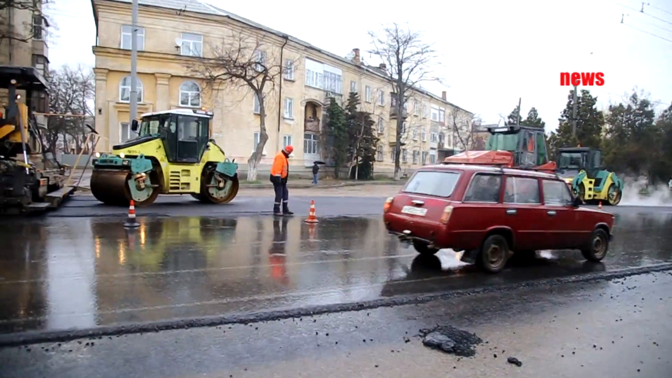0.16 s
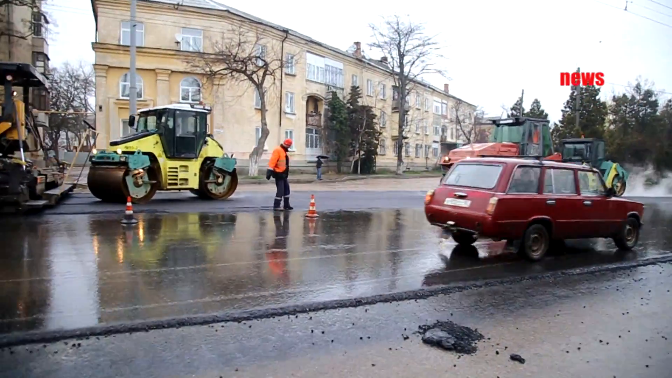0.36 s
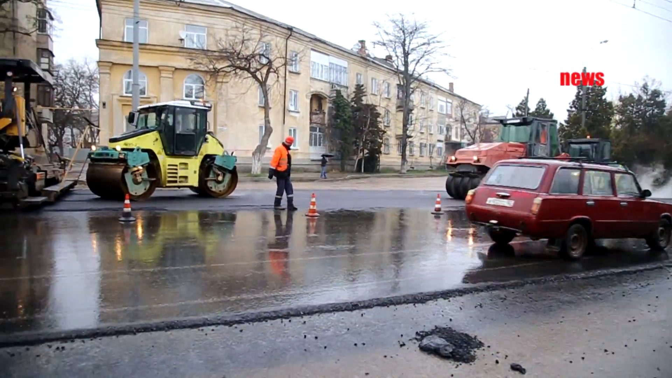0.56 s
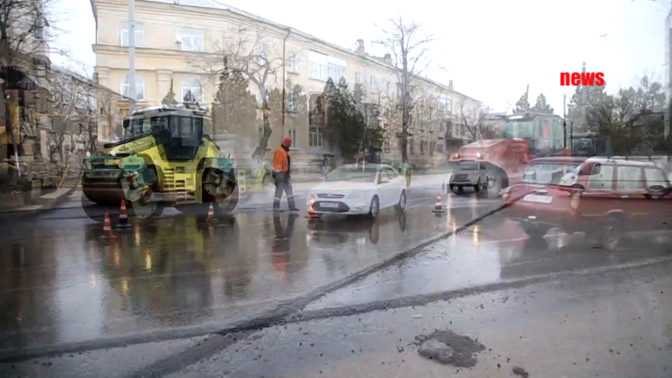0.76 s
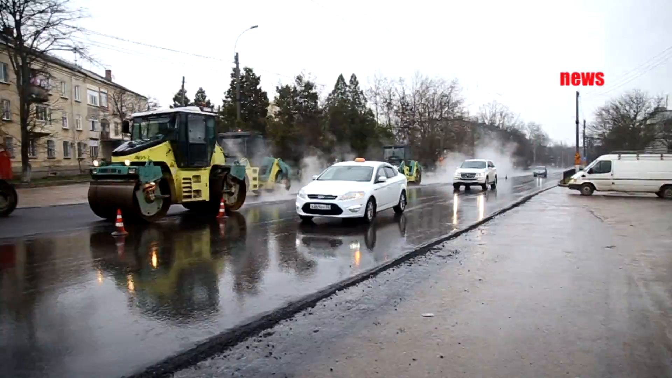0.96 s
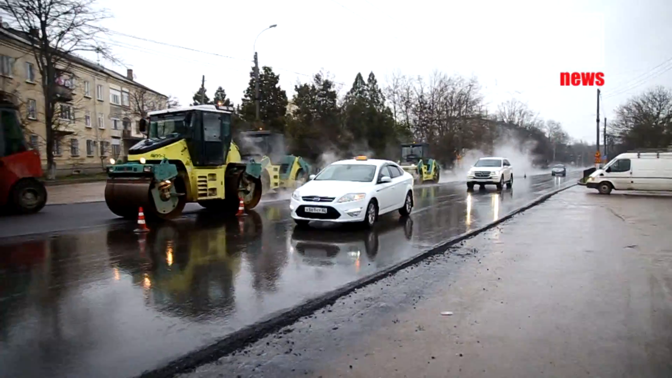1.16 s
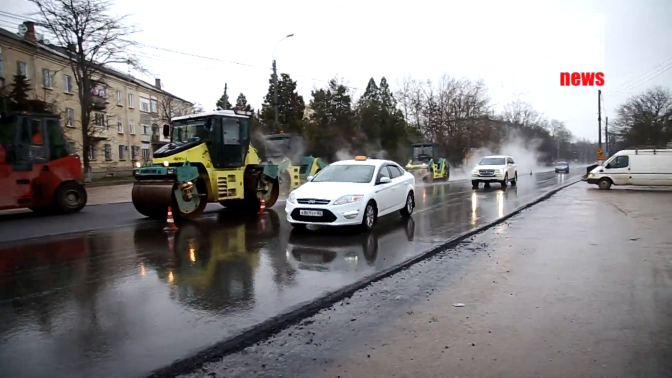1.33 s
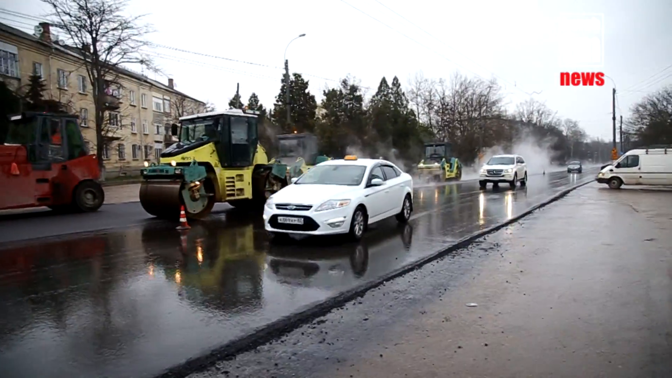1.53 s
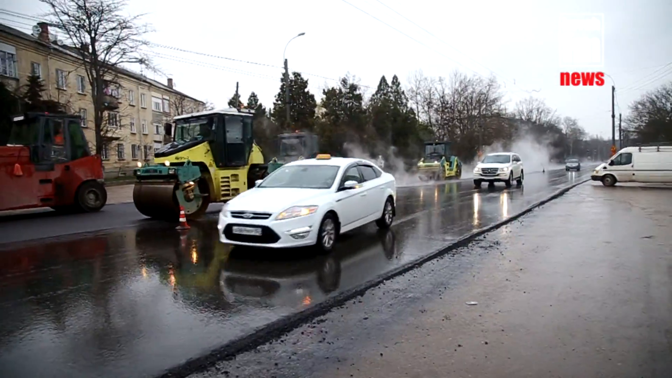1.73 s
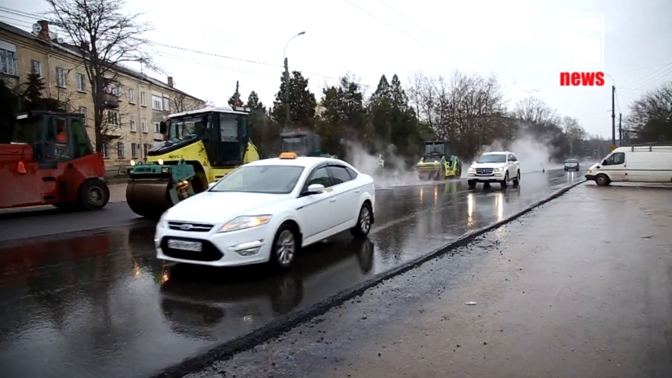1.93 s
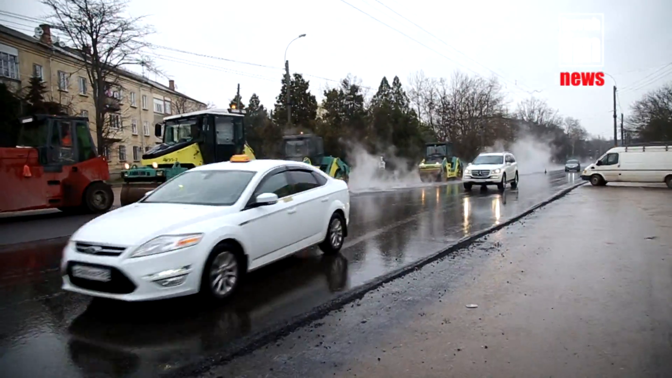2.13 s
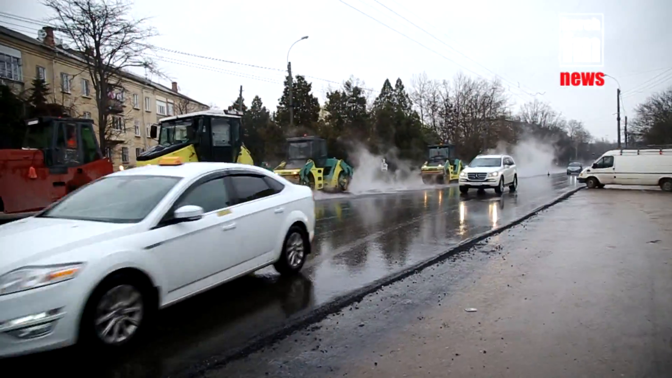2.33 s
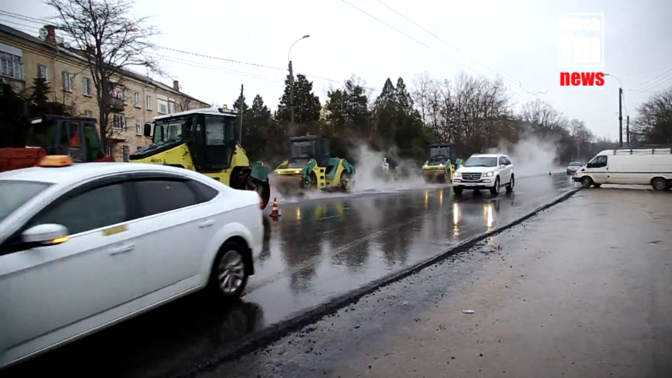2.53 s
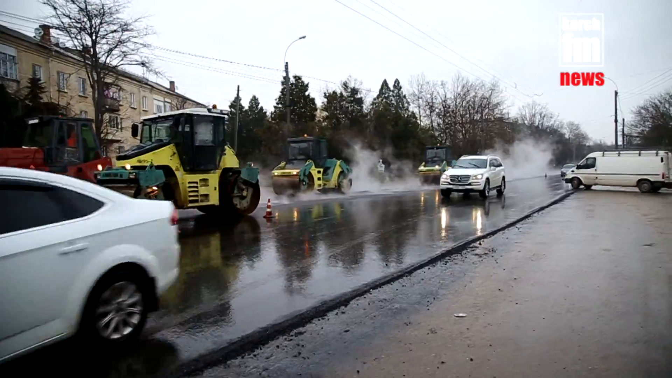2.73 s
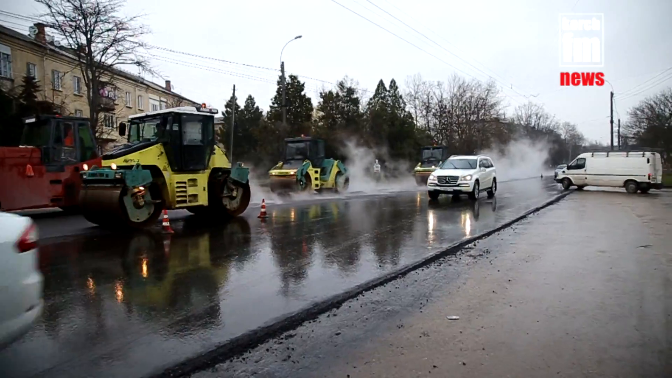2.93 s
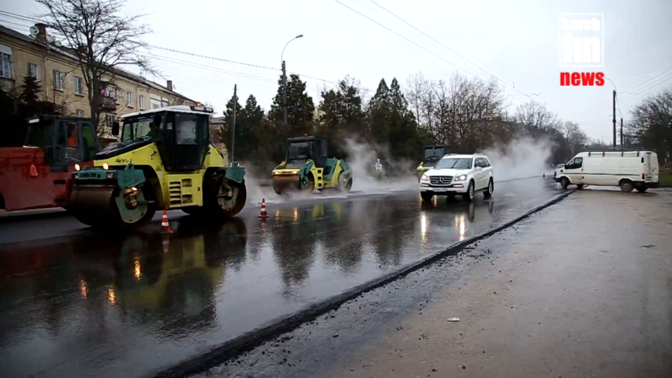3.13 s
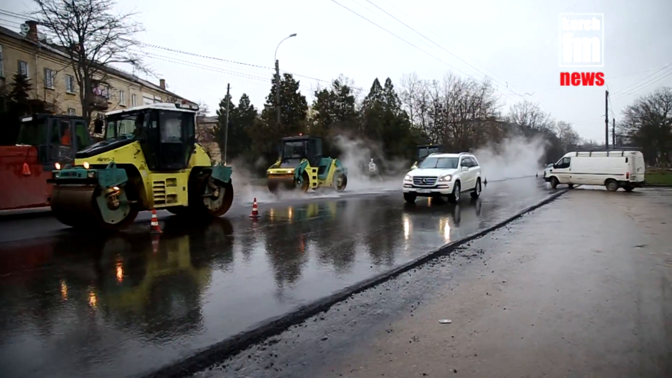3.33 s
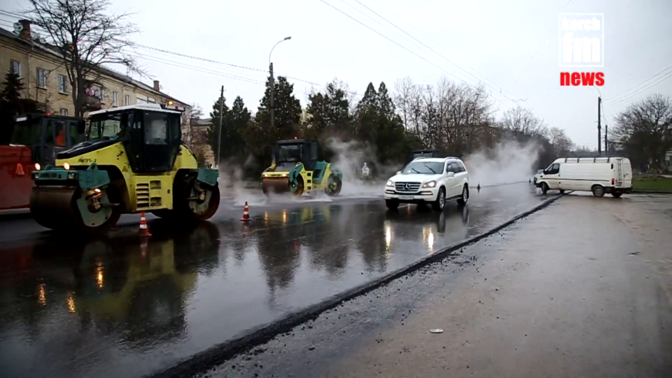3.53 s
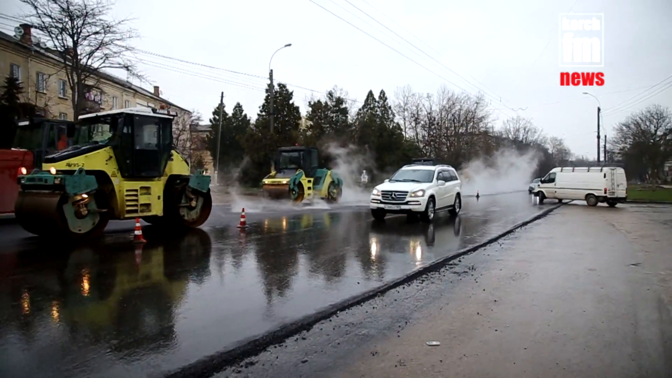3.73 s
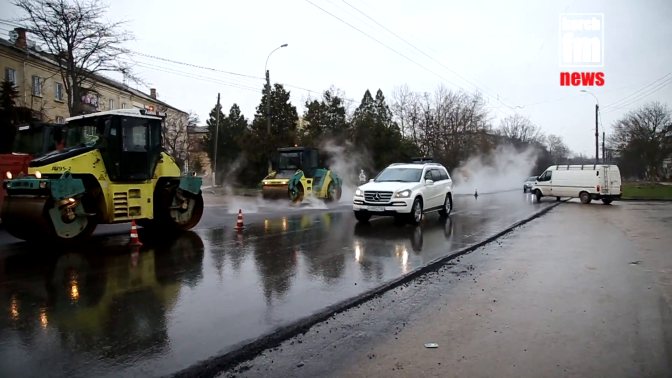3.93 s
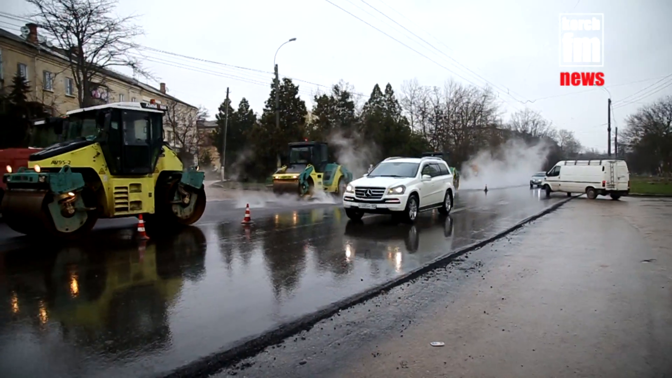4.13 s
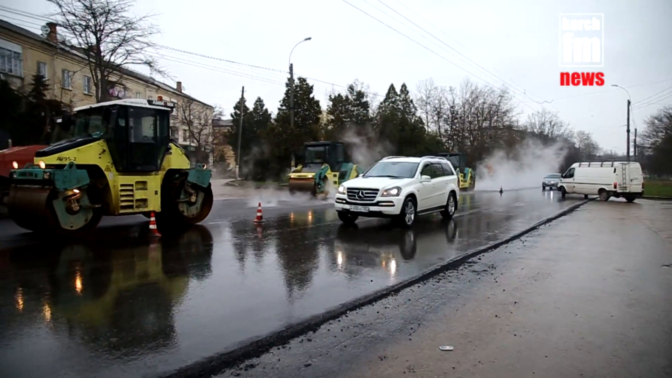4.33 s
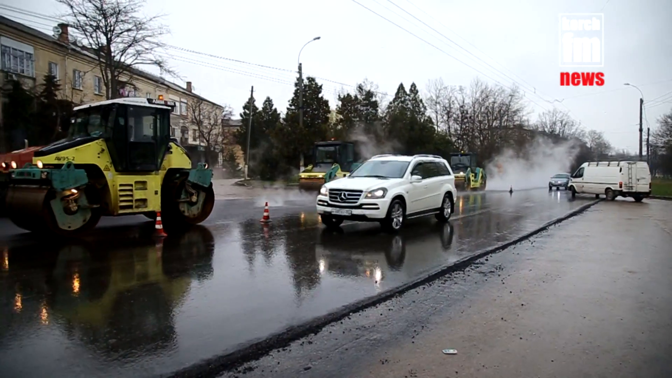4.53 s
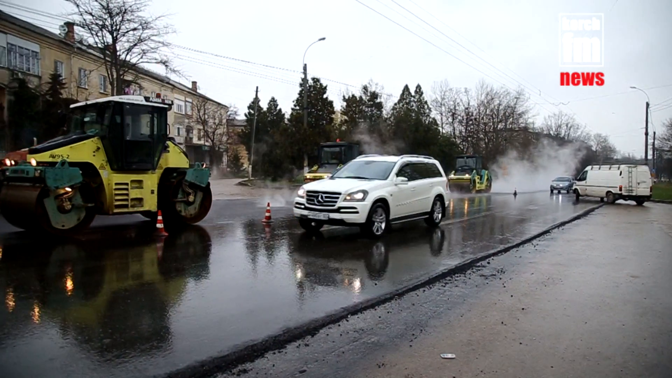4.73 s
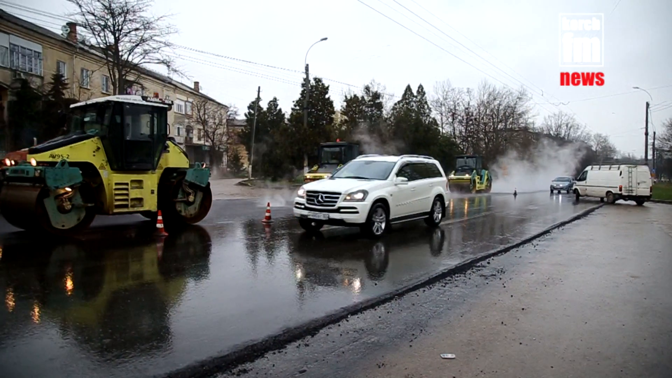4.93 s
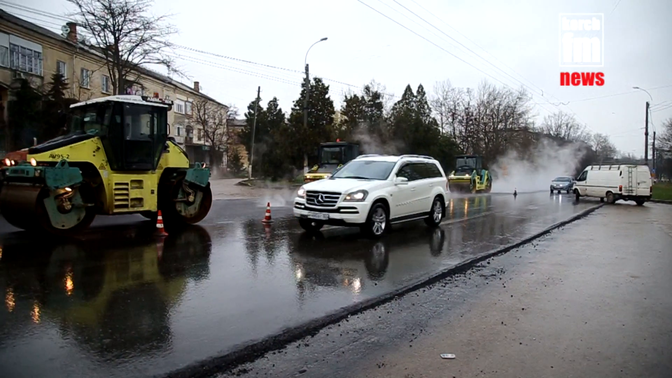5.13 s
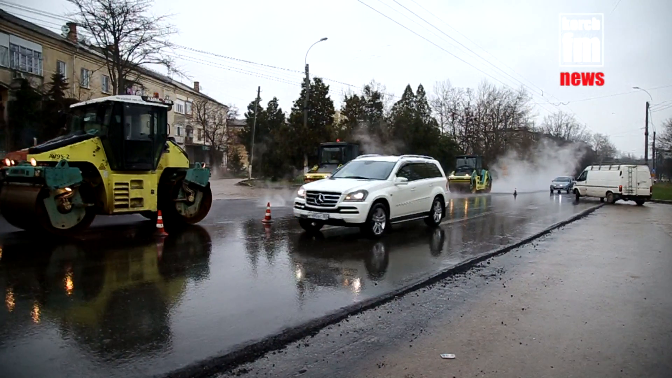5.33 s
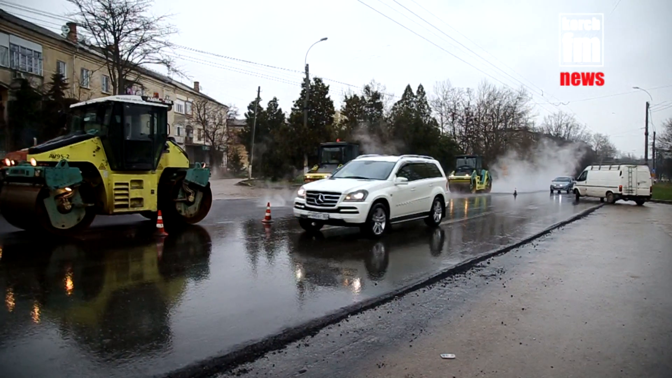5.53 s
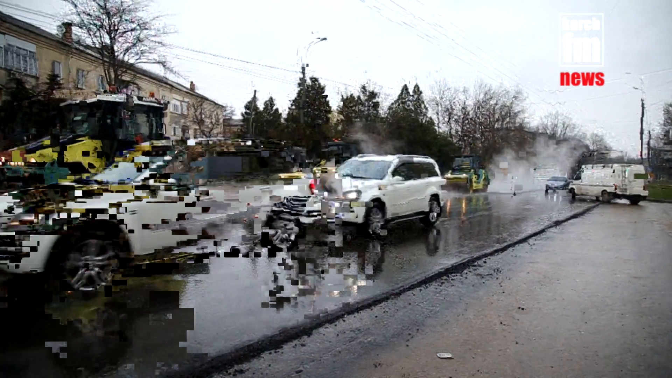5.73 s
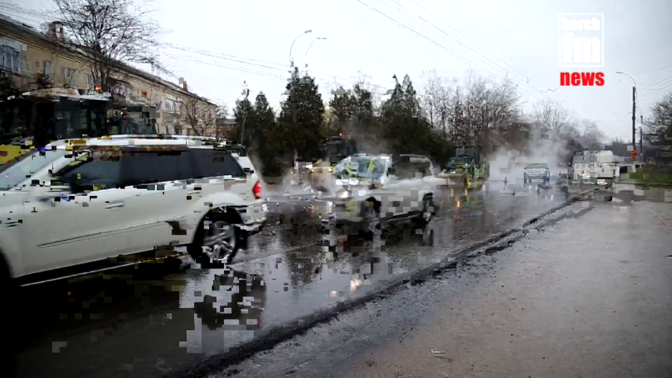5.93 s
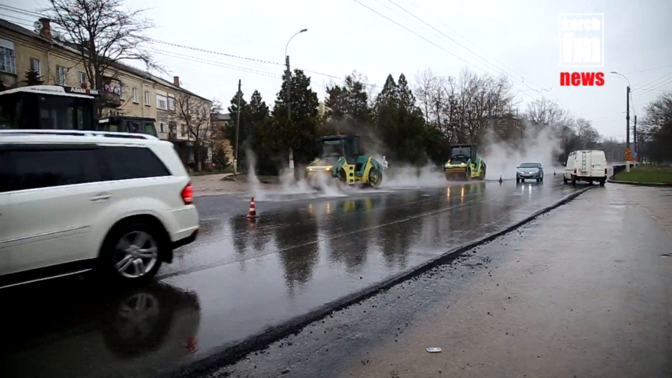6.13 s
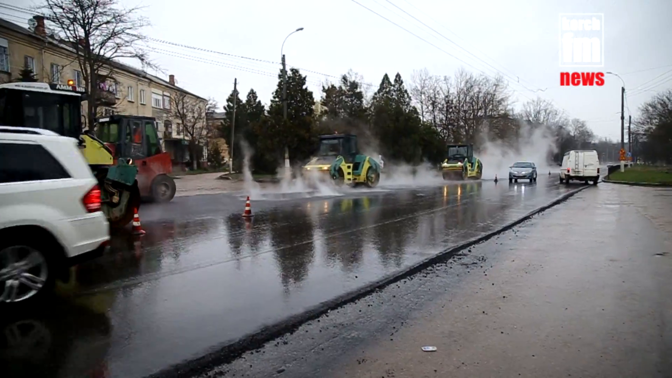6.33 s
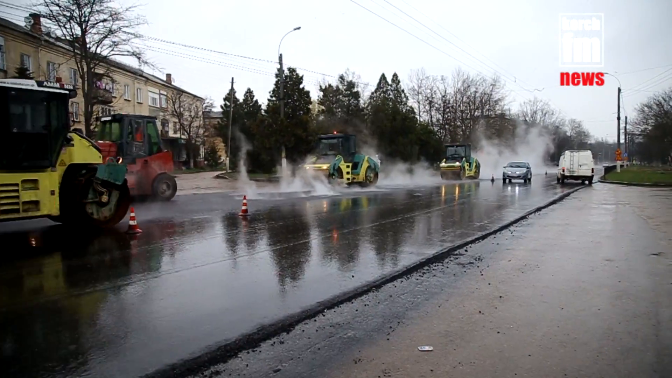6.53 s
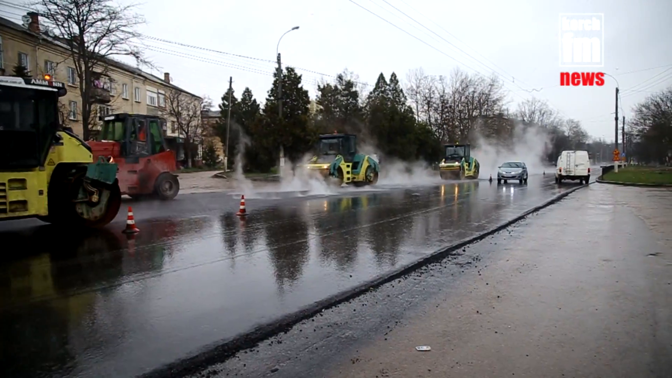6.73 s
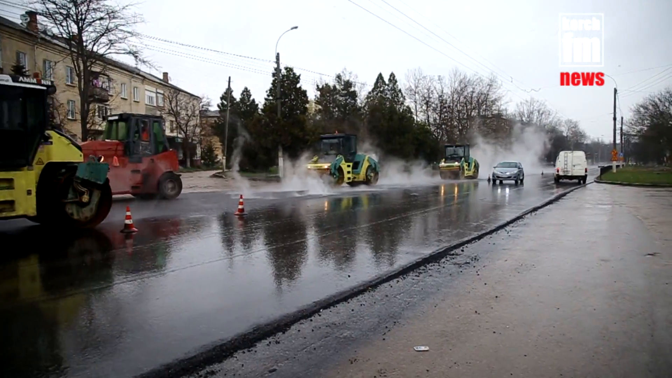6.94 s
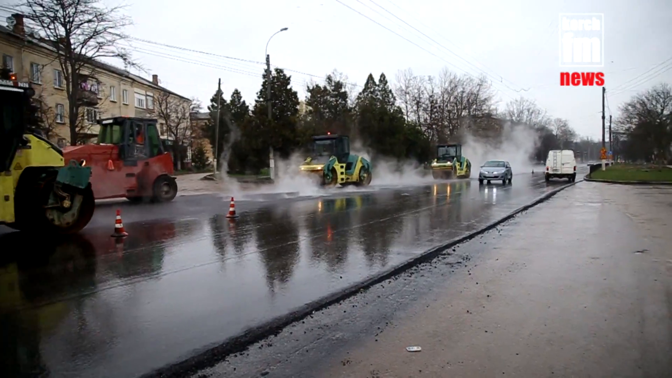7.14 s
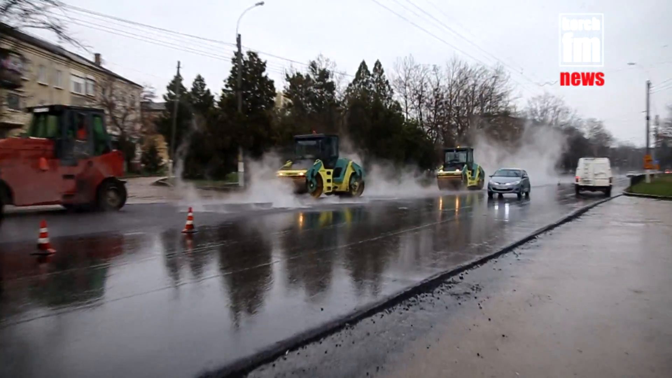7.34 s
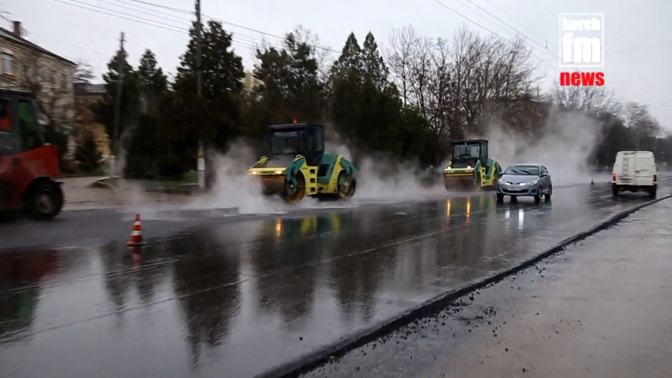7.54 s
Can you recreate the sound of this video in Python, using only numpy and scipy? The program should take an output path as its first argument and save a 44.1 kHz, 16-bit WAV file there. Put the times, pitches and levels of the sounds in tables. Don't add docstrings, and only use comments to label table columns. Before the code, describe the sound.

Mono, roadside on a wet street. Throughout, diesel rollers give a broad low exhaust roar, mid casing noise, rattly valve clatter and steady low hum, with a fan droning near 280 Hz. From 0 to 0.65 s, sharp grit ticks cluster, a high pump whine sings, and a very short scraper squeak sounds around 0.4 s. From about 0.8 to 1.3 s a second fan beats against the first. Wet tyre hiss swells to a peak near 2.5 s, then recedes; a hard splash tick lands at 3.0 s. Soft drum groans pass between 2.6 and 4.4 s, while the fan is strong. At 4.63 s everything cuts to total silence until 5.49 s. Sound returns abruptly: lower pump whine, fading fan, tyre hiss strongest around 6.3 s, and frequent wet splashes and ticks until 6.8 s. Low groans and a last loud tick near 7.4 s precede the end, engines still running.

```python
import sys
import numpy as np
from scipy import signal
from scipy.fft import rfft, irfft
from scipy.io import wavfile

SR = 44100
rng = np.random.default_rng(int(sys.argv[2]) if len(sys.argv) > 2 else 0)


def digitize_waveform(pressure):
    field = np.atleast_2d(pressure).T
    bounded = np.clip(field, -1, 1)
    quanta = np.round(bounded * 32767).astype(np.int16)
    wavfile.write(sys.argv[1], SR, quanta)


def voltage_ratio(level):
    return 10 ** (np.asarray(level, float) / 20)


N = 334100


def curves(table):
    s, *columns = np.transpose(table)
    return [np.interp(np.arange(N) / SR, s, column) for column in columns]


def arch(s, length, power=1.0):
    return np.sin(np.pi * np.clip((np.arange(N) / SR - s) / length, 0, 1)) ** power


def rms_one(x):
    return x / np.sqrt(np.mean(x ** 2) + 1e-20)


def drift(rate):
    pole = np.exp(-80 * np.pi * rate / SR)
    white = rng.standard_normal(N // 40 + 2002)
    slow = signal.lfilter([1], [1, -2 * pole, pole * pole], white)[2000:]
    return np.interp(np.arange(N) / 40, np.arange(len(slow)), rms_one(slow))


def tone(hz, wobble_hz, flutter_db, rate=6.0):
    phase = 2 * np.pi * (np.cumsum(hz + wobble_hz * drift(rate)) / SR + rng.random())
    return np.sqrt(2) * np.sin(phase) * voltage_ratio(flutter_db * drift(rate))


def banded(source, spectrum, patchy_db, rate):
    hz, level_db = np.transpose(spectrum)
    edges = hz[0] * 2 ** np.arange(0, np.log2(hz[-1] / hz[0]), 1 / 4)
    out, together = 0, drift(2.4)
    for k, (low, high) in enumerate(zip(edges, edges[1:])):
        band_pass = signal.butter(2, [low, high], "band", fs=SR, output="sos")
        band = signal.sosfilt(band_pass, source[k % 2])
        centre_db = np.interp(np.log(low * high) / 2, np.log(hz), level_db)
        flicker_db = patchy_db * (0.63 * together + drift(rate))
        out = out + band * voltage_ratio(centre_db + flicker_db)
    return rms_one(out)


# time in seconds, notch frequency in Hz, depth in dB (sign ignored).
ROAD_NOTCH = [(0, 8200, 6), (.6, 8000, 5), (1.2, 9200, 3), (2.5, 9080, 3), (2.9, 9000, 0.5),
              (3.25, 9100, 1), (3.6, 9000, -2), (4, 8930, 2.5), (4.6, 9160, 1), (5.5, 8850, 2),
              (6.05, 8340, 4), (6.3, 8260, 4), (6.55, 8500, 6), (6.95, 9780, 5), (7.5, 9520, 6)]


def road_reflection(hiss):
    notch_hz, depth_db = curves(ROAD_NOTCH)
    turn = np.exp(2j * np.pi * np.cumsum(notch_hz) / SR)
    low_pass = signal.butter(1, 900, fs=SR)
    near_notch = 2 * np.real(signal.filtfilt(*low_pass, hiss / turn) * turn)
    return hiss - (1 - voltage_ratio(-np.abs(depth_db))) * near_notch


# time in seconds, tread hiss in dB, fineness of the spray in dB.
CAR_SPRAY = [(0, -40, 1), (.6, -39.5, 3.5), (.85, -35, -1.5), (1.5, -35, -0.5), (2.0, -32.5, 1.5),
             (2.45, -30.5, 0.5), (2.9, -35, 1), (3.17, -35.5, 0.5), (3.3, -39.5, 2.5), (3.9, -39.5, 0),
             (4.3, -39, 1), (4.6, -35.5, 0), (5.5, -35, 3), (6.3, -32, 3.5), (6.75, -33, 3),
             (6.95, -34, -.5), (7.3, -33, -2), (7.58, -35.5, -3)]
# start in seconds, length in seconds, swell in dB (negative: a brief dip).
SPLASHES = [(2.646, .11, 1), (2.98, .2, 2), (4.47, 0.069, -1.5), (5.592, .07, 3), (5.832, .1, 2),
            (6.282, 0.11, 1.5), (6.547, .09, 0.5), (6.703, 0.062, -0.5), (0.124, .06, -0.5),
            (0.796, 0.1, 0.5), (2.38, 0.18, 0), (6.08, 0.087, 1.5), (7.03, 0.083, -1.5)]
# frequency in Hz, level in dB per Hz.
TREAD_COLOUR = [(1800, -11.5), (3000, 4.5), (4300, 4), (5500, -2), (7000, -2.5), (8500, -8.5), (11000, -29)]
MIST_COLOUR = [(6500, -21), (8800, -6.5), (10500, 0.5), (11800, -1), (13200, -14.5), (15500, -26)]
FIZZ_COLOUR = [(10000, -20.5), (12000, 2), (13200, -1.5), (15000, -3.5), (18500, -9)]
MIST_DB, FIZZ_DB = -10, -18
FIZZ_SWELL, FIZZ_FINENESS = 1.1, 0.7


def tyres():
    size_db = 4.5 * np.minimum(rng.exponential(1, (2, N)), 4.5)
    sizes = voltage_ratio(size_db) * rng.choice([-1, 1], (2, N))
    drops_per_s = 2500 * voltage_ratio(3.0 * drift(14.0))
    drops = sizes * (rng.random((2, N)) < drops_per_s / SR)
    wet = rng.standard_normal((2, N)) + 0.81 * rms_one(drops)

    cars_db, fine_db = curves(CAR_SPRAY)
    splash_db = sum(db * arch(s, length) for s, length, db in SPLASHES)
    splash_db = splash_db + 0.8 * drift(14.0) + 0.26 * drift(35.0)
    tread_db = cars_db + splash_db
    mist_db = tread_db + MIST_DB + fine_db
    extra_swell_db = (FIZZ_SWELL - 1) * (tread_db - tread_db.mean())
    fizz_db = tread_db + FIZZ_DB + FIZZ_FINENESS * fine_db + extra_swell_db + 0.6 * splash_db

    hiss = voltage_ratio(tread_db + 5.5) * banded(wet, TREAD_COLOUR, patchy_db=0.46, rate=53.0)
    hiss += voltage_ratio(mist_db + 5.0) * banded(wet[::-1], MIST_COLOUR, patchy_db=-0.3, rate=18.0)
    hiss += voltage_ratio(fizz_db + 1.1) * banded(np.roll(wet, 999), FIZZ_COLOUR, patchy_db=0.2, rate=20.0)
    return road_reflection(hiss)


# time in seconds, peak in dB, ring frequency in Hz, bright edge in dB.
TICKS = [(0.0118, -14, 3700, -20), (0.0535, -10.5, 3720, -23), (0.1426, -9, 3860, -27),
         (0.1535, -7.5, 3700, -24), (0.1634, -13, 4490, -24), (0.1714, -23.5, 3500, -20),
         (0.3499, -17, 3270, -24), (0.5288, -25, 3490, -21), (0.556, -10.5, 4100, -24),
         (0.6325, -12, 3330, -23), (2.2604, -12, 3790, -20), (2.4044, -8, 3300, -17),
         (3.007, -1.5, 3620, -24), (3.072, -9, 3616, -31), (5.6034, -10.5, 3720, -18),
         (5.8966, -11, 3530, -14), (5.9594, -19, 3350, -24), (6.124, -7, 3390, -21), (6.269, -5, 3540, -23),
         (6.5006, -3, 3200, -25), (6.5744, -6.5, 3210, -15), (6.6875, -5, 3690, -25),
         (6.8069, -8, 3470, -24), (7.4023, -1, 3430, -29)]


def ticks():
    out, t = np.zeros(N), np.arange(600) / SR
    onset = np.minimum(t / 0.0006, 1)
    bright = signal.butter(3, [2600, 7500], "band", fs=SR, output="sos")
    for s, peak_db, hz, edge_db in TICKS:
        ring_s = 0.0008 if s < 1 else 0.0004
        ring = np.sin(2 * np.pi * hz * t) * np.exp(-t / ring_s) * onset
        edge = signal.sosfilt(bright, rng.standard_normal(600) * np.exp(-t / 0.0012) * onset)
        out[round(s * SR):][:600] += voltage_ratio(peak_db + 4.5) * (ring + voltage_ratio(edge_db + 13) * edge)
    return out


# start in seconds, length in seconds, start and end frequency in Hz,
# level in dB.
GROANS = [(0.167, 0.14, 835, 823, -30.5), (.28, 0.13, 680, 667, -32.5), (.66, 0.41, 2290, 2280, -40),
          (1.1, 0.18, 929, 935, -37), (2.3, .08, 804, 820, -33), (2.638, 0.074, 395, 385, -30),
          (2.67, 0.1, 685, 692, -30), (2.72, 0.087, 745, 765, -31), (3.13, 0.14, 770, 737, -31.5),
          (3.296, 0.8, 597, 604, -34), (3.65, 0.09, 603, 595, -34.5), (4.27, 0.24, 142.6, 142.7, -22),
          (4.22, .1, 1123, 1130, -31), (7.15, 0.31, 232, 226, -28), (7.16, .28, 196, 189, -29.5),
          (0.199, 0.46, 1141, 1148, -34), (5.7, 1.0, 1140, 1142, -35.5), (0.044, 0.99, 138, 144.2, -31),
          (0.423, .3, 118, 125, -33), (.335, .03, 2480, 2520, -35), (.42, .2, 2290, 2290, -35.5),
          (.7, 0.044, 2310, 2290, -32), (1.749, 0.73, 198, 202.6, -31), (3.4, 0.21, 760, 765, -33.5),
          (6.5, 0.41, 148.3, 149.5, -33)]


def groans():
    out, t = np.zeros(N), np.arange(N) / SR
    for s, length, from_hz, to_hz, level_db in GROANS:
        part = np.clip((t - s) / length, 0, 1)
        glide_hz = from_hz + (to_hz - from_hz) * part
        voice = tone(glide_hz, 2.5 + 0.00807 * from_hz, flutter_db=2.5, rate=28.0)
        out += voltage_ratio(level_db) * np.sin(np.pi * part) ** 0.5 * voice
    return out


# start in seconds, length in seconds, start and settled frequency in Hz.
SQUEAK = (.385, .043, 2215, 2335)
# multiple of the fundamental, level in dB, fade in seconds.
SQUEAK_PARTIALS = [
    (1, -18, .08),
    (4, -40, .018),
    (5, -36, .04),
]


def squeak():
    s, length, from_hz, to_hz = SQUEAK
    part = np.clip((np.arange(N) / SR - s) / length, 0, 1)
    phase = 2 * np.pi * np.cumsum(to_hz + (from_hz - to_hz) * np.exp(-part / 0.12)) / SR
    out = np.zeros(N)
    for multiple, level_db, fade_s in SQUEAK_PARTIALS:
        envelope = np.sin(np.pi * part) ** 0.3 * np.exp(-(part * length / fade_s) ** 2)
        out += voltage_ratio(level_db) * envelope * np.sin(multiple * phase)
    return out


# pitch in Hz, then swells of start in seconds, length in seconds, level in dB.
PUMPS = [
    (1211, [(-.3, 1.3, -33), (.22, .22, -33), (.68, .09, -33), (1.0, 1.5, -41), (1.95, .55, -44)]),
    (455, [(-.3, .7, -36.5), (2.9, .3, -37), (3.9, 1.0, -37.5), (5.35, .5, -32), (5.6, 2.4, -36), (6.75, .38, -36)]),
]


def pumps():
    out = np.zeros(N)
    for hz, swells in PUMPS:
        gain = sum(voltage_ratio(level_db) * arch(s, length, power=0.41) for s, length, level_db in swells)
        out += gain * tone(hz, 1.6, flutter_db=2.3, rate=16.0)
    return out


# firing frequency in Hz, then pairs of order (multiple of it) and level in dB.
ENGINES = [
    (40.46, [(1, -35), (2, -34)]),
    (71, [(1, -33), (2.03, -41), (3, -49)]),
    (50, [(1, -41), (3, -48.5), (3.7, -41), (4, -33.5), (5, -43.5), (5.93, -36)]),
]


def engines():
    out = np.zeros(N)
    for hz, orders in ENGINES:
        for order, level_db in orders:
            out += voltage_ratio(level_db) * tone(order * hz, 0.05 * order, flutter_db=1.8, rate=1.5)
    return out


# time in seconds, pitch in Hz, level in dB.
FAN = [(0, 280, -24.5), (.45, 284.6, -22), (.85, 280.5, -26.5), (1.05, 279.5, -26.5), (1.35, 275.1, -21.5),
       (1.7, 276, -26), (2.25, 278.3, -31.5), (2.7, 277.7, -28), (3.15, 278.5, -19.5), (3.7, 280.5, -20.5),
       (3.95, 280.2, -23.5), (4.6, 279, -22.5), (5.5, 276.3, -26), (5.7, 275.5, -30), (5.8, 277.5, -47),
       (6.25, 275.8, -33.5), (6.9, 276.7, -33.5), (7.58, 272, -50)]
# start in seconds, length in seconds, pitch in Hz, level in dB.
BRIEF_FAN_TONE = (0.78, 0.53, 284.5, -29.5)


def fans():
    hz, level_db = curves(FAN)
    broken_db = np.clip(0.35 * (-25 - level_db), 0, 6) * drift(9.0)
    out = voltage_ratio(level_db + broken_db) * tone(hz, 0.35, flutter_db=0.8, rate=12.0)
    s, length, hz, level_db = BRIEF_FAN_TONE
    out += voltage_ratio(level_db) * arch(s, length, power=0.5) * tone(hz, 0.6, flutter_db=2.0, rate=9.0)
    return out


# frequency in Hz, level in dB per Hz.
RUMBLE_COLOUR = [(30, -38.5), (42, -9.5), (60, -3), (110, -5.5), (190, 0), (260, -3), (340, -9.5),
                 (500, -33)]
CASING_COLOUR = [(200, -18), (340, 2.5), (480, 1.5), (800, 2), (1100, 1), (1500, -3.5), (2200, -22)]
CLATTER_COLOUR = [(800, -14), (1300, 3), (2000, 3.5), (3000, 0.5), (4000, -6), (5000, -13), (6500, -25.5)]
# start in seconds, length in seconds, rumble change in
# dB, casing # change in dB.
SURGES = [
    (0.206, 0.23, 4.5, 0),
    (0.856, 0.21, -6, -3),
    (1.8, 0.47, 1, 0),
    (2.347, 0.39, -2.5, -1.5),
    (2.6, 1, 0, 0.5),
    (3.4, 0.98, 1, 2),
    (3.994, 0.88, 2.5, 0),
    (6.353, .55, 2.5, 1),
    (7.15, 0.34, 1.5, 1.5),
]
# middle of leaving in seconds, duration of leaving
# in seconds, casing change in dB, clatter change in dB.
FIRST_SPOT = (-0.2, 2.8, -3, 4.5)
# rumble in dB, casing in dB, clatter in dB.
LOAD_SWING_DB = (1, 0.69, .5)
RUMBLE_DB, CASING_DB, CLATTER_DB = -26.5, -25, -24.5
CLATTER_FOLLOWS = 0.47
KNOCK_HZ = 40.9


def roar():
    leaves, over, shade_db, near_db = FIRST_SPOT
    first = np.clip((leaves - np.arange(N) / SR) / over + 0.5, 0, 1)
    cars_db = curves(CAR_SPRAY)[0]
    rumble_db = RUMBLE_DB + sum(db * arch(s, length) for s, length, db, _ in SURGES)
    casing_db = CASING_DB + shade_db * first + sum(db * arch(s, length) for s, length, _, db in SURGES)
    clatter_db = CLATTER_DB + near_db * first + CLATTER_FOLLOWS * (cars_db - cars_db.mean())

    turn = 2 * np.pi * np.cumsum(KNOCK_HZ + 1.2 * drift(4.0)) / SR
    knock = np.exp(2.9 * np.cos(turn)) * voltage_ratio(5.0 * drift(1.2))
    throb = 1 + 0.012 * knock
    white = rng.standard_normal((3, 2, N))
    rumble = banded(white[0], RUMBLE_COLOUR, patchy_db=0.5, rate=8.0)
    casing = banded(white[1], CASING_COLOUR, patchy_db=0.5, rate=12.0)
    clatter = banded(white[2] * throb, CLATTER_COLOUR, patchy_db=0.76, rate=12.0)

    layers = zip((rumble, casing, clatter), (rumble_db, casing_db, clatter_db), LOAD_SWING_DB)
    return sum(voltage_ratio(level_db + swing_db * drift(3.6)) * noise for noise, level_db, swing_db in layers)


def scene():
    street = tyres() + ticks()
    rollers = groans() + squeak() + pumps() + engines() + fans() + roar()
    return (street + rollers)[None]


def band_limit(x):
    return signal.sosfilt(signal.butter(12, 15700, fs=SR, output="sos"), x)


# frequency in Hz, gain in dB.
MICROPHONE = [(4300, 0.5), (4800, -1), (6500, -1.5), (11500, -2), (12300, -6), (13000, -4), (13800, -3),
              (15000, -2)]
# start in seconds, end in seconds.
DROPOUT_S = (4.6281, 5.4919)
TOP_HZ = 15150


def record(dry):
    hz = np.fft.rfftfreq(N, 1 / SR)
    x = signal.sosfilt(signal.butter(4, 38, "high", fs=SR, output="sos"), dry)
    x = irfft(rfft(x) * voltage_ratio(np.interp(hz, *np.transpose(MICROPHONE))), N)
    x = 1.182 * np.tanh(x / 1.223)
    x = irfft(rfft(x) * np.clip((TOP_HZ - hz) / 60, 0, 1), N)
    t = np.arange(N) / SR
    outside_s = np.maximum(DROPOUT_S[0] - t, t - DROPOUT_S[1])
    x = x * np.clip(outside_s / 0.00025, 0, 1)
    return band_limit(x)


dry = scene()
out = record(dry)
digitize_waveform(out)
```